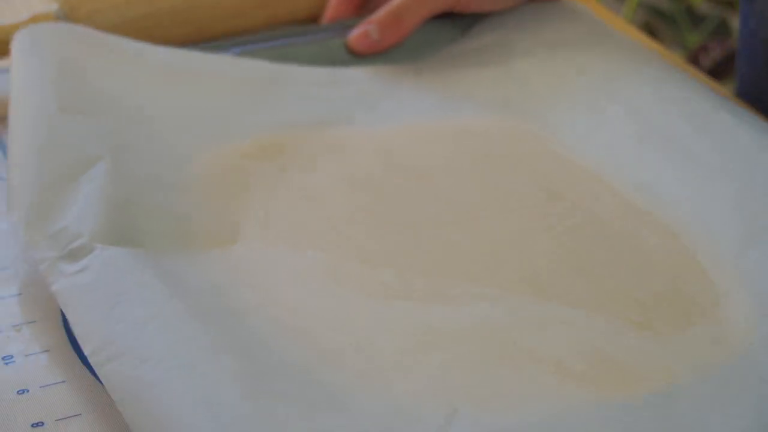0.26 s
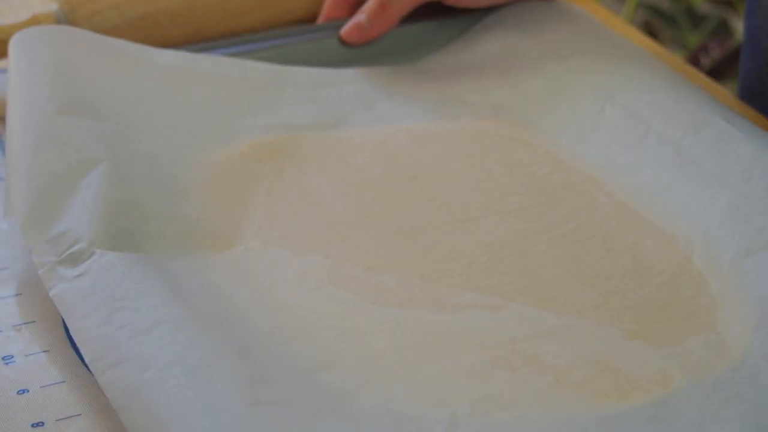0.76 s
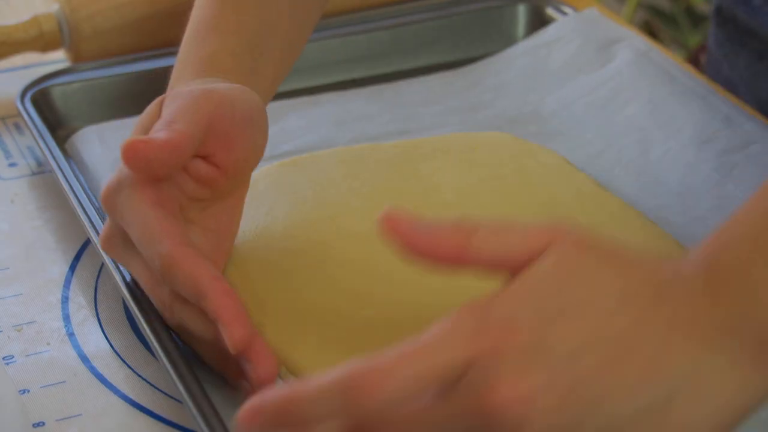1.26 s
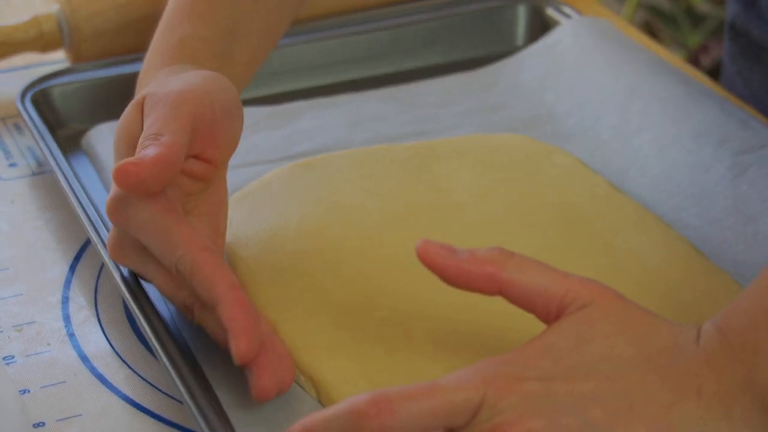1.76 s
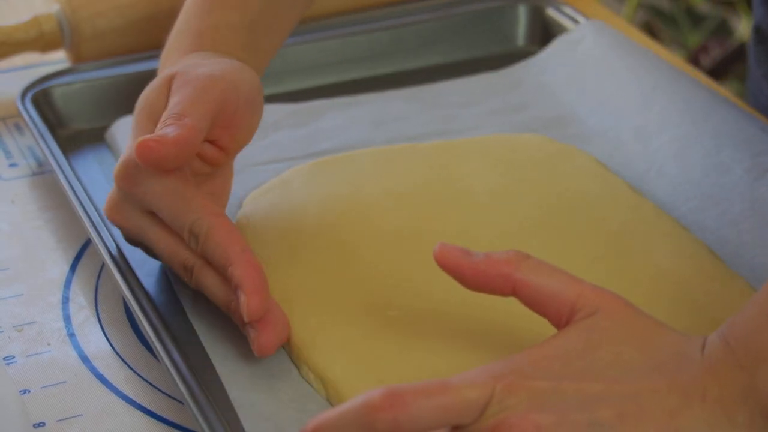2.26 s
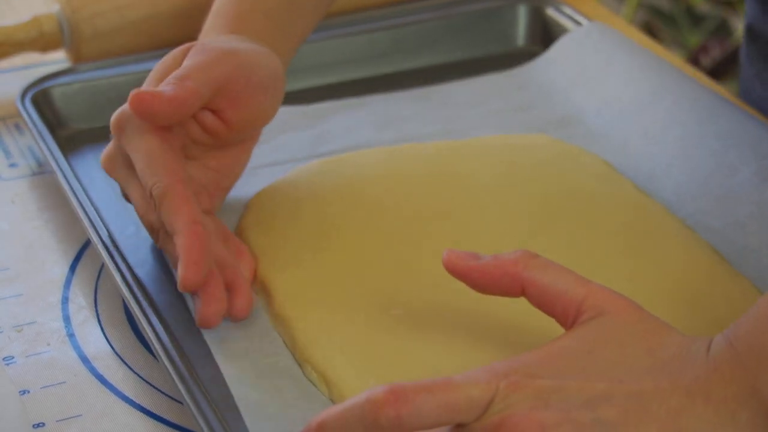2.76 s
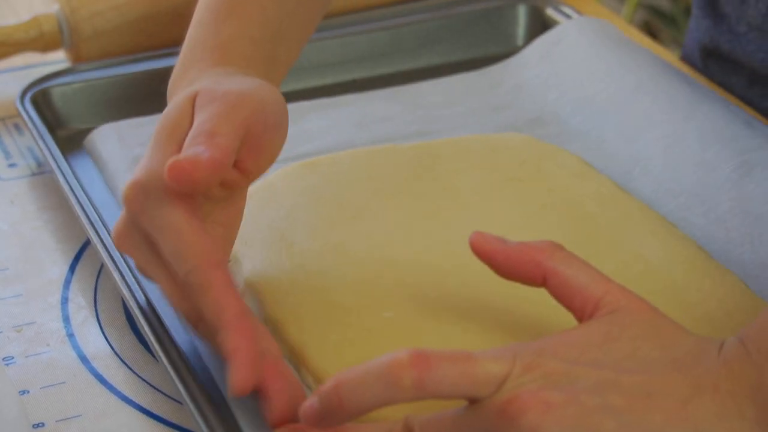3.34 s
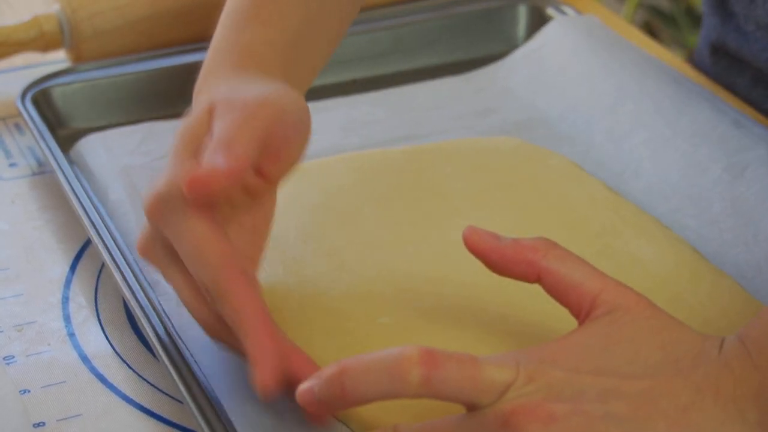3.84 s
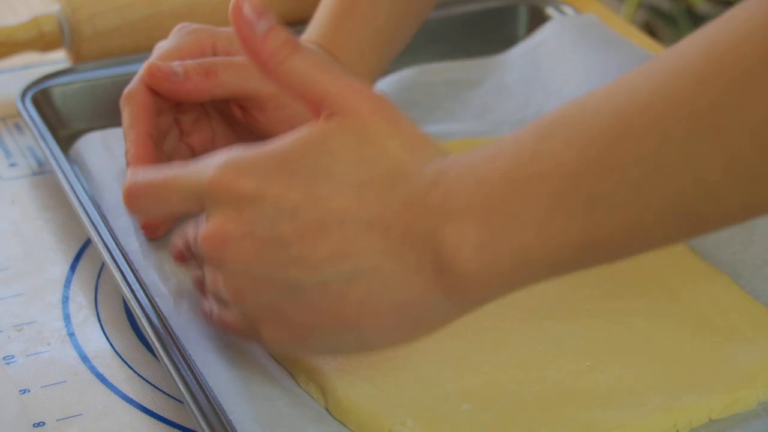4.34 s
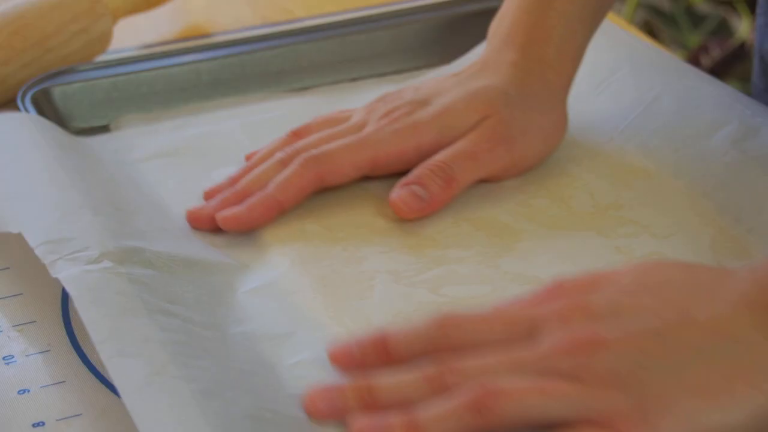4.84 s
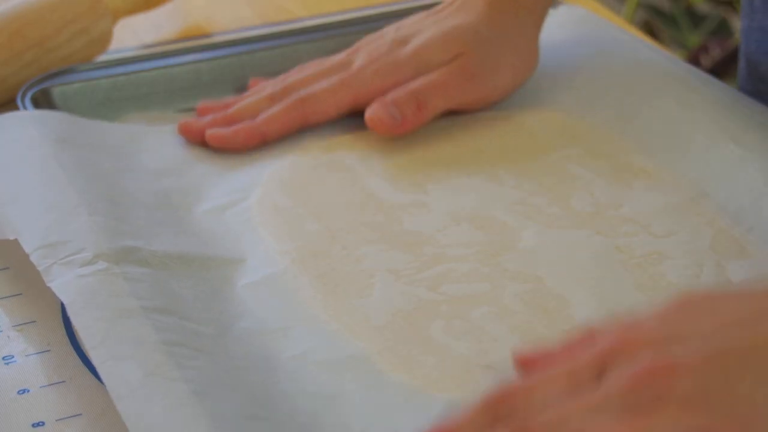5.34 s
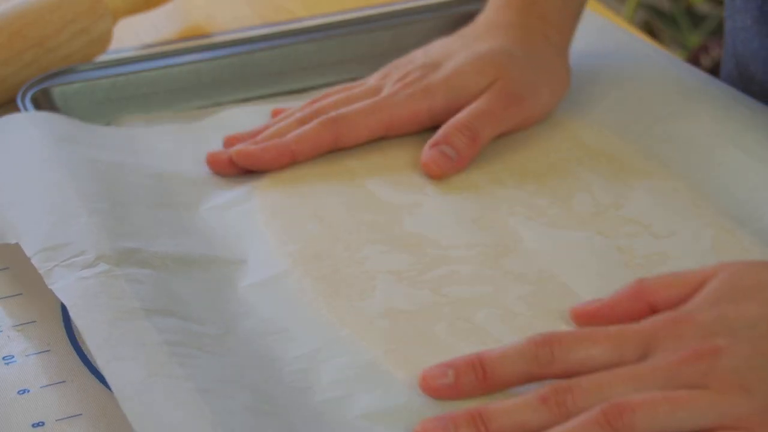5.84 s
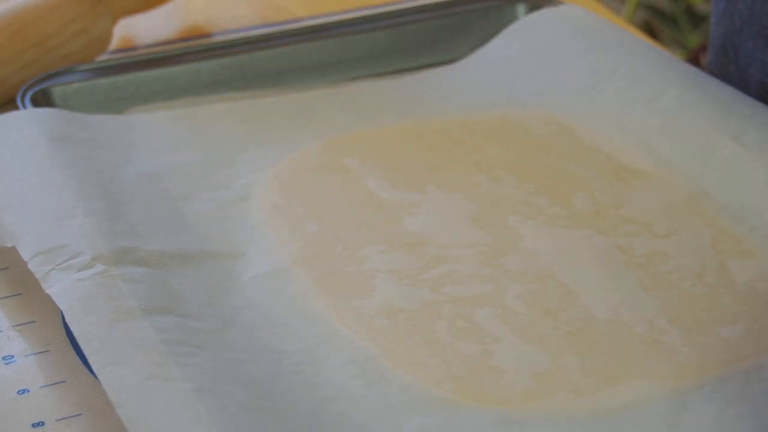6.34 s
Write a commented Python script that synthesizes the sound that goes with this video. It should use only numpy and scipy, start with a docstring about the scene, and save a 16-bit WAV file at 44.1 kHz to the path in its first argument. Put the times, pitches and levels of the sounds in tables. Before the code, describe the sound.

Hands press and smooth dough under baking paper; soft tray knocks, then crisp crinkling that gathers and peaks in a sharp crackle near the end.

```python
"""Hands press and smooth dough on baking paper in a metal tray, close to a single microphone in a kitchen.
It opens with tray knocks and quiet hiss; from about 1 s creases snap, loudest first near 1.3 s.
Strokes and snaps go on, crowd together from 4.8 s and peak near 5.8 s; last knocks come at about 6.5 s.
The paper is shaped noise, hissing under skin and snapping at creases; the tray is a set of ringing modes.
A short room echo follows paper and tray, and a faint hum of filtered noise lies under everything."""
import sys
import numpy as np
from scipy import signal
from scipy.fft import rfft, irfft
from scipy.io import wavfile
from scipy.ndimage import uniform_filter1d

SR = 44100
rng = np.random.default_rng(int(sys.argv[2]) if len(sys.argv) > 2 else 0)


def store_wav(level_fs):
    """Save 16-bit WAV to argv[1]."""
    pcm = np.round(np.clip(np.atleast_2d(level_fs), -1, 1) * 32767)
    wavfile.write(sys.argv[1], SR, pcm.T.astype(np.int16))


N = 291501  # length in samples

# tone colour of the paper, for hiss and snaps alike: pitch_hz [Hz], level_db [dB per Hz]
PAPER_COLOUR = [(120, -50), (200, -12), (306, -19), (388, -11.5), (701, -9), (977, -8), (1640, 0.5),
                (2690, 6.5), (8440, 3.5), (10500, -18), (14700, -18), (15500, -34), (16400, -14.5)]


def undb(db):
    """Turn decibels into a plain gain."""
    return 10 ** (np.asarray(db) / 20)


def unit(x):
    """Scale a sound to an average (RMS) level of one."""
    return x / np.sqrt(np.mean(x ** 2))


def curve(table, hz):
    """Read (Hz, value) points on a log-frequency axis."""
    point_hz, value = np.transpose(table)
    return np.interp(np.log(np.maximum(hz, 1)), np.log(point_hz), value)


def thirds(hz):
    """Split the spectrum softly into body, middle and air (edges 1.5 and 9.5 kHz); the shares add up to one."""
    body = 1 / (1 + (hz / 1500) ** 6)
    air = 1 - 1 / (1 + (hz / 9500) ** 16)
    return body, 1 - body - air, air


def fade(t, t60):
    """Die away by 60 dB in t60 seconds."""
    return np.exp(-np.log(1000) * t / t60)


def walk(rate):
    """Wander at random: levels held 1 / rate seconds, then smoothed twice; spread near 1."""
    hold = int(SR / rate)
    steps = np.repeat(rng.standard_normal(N // hold + 1), hold)
    smooth = uniform_filter1d(uniform_filter1d(steps, hold), hold)
    return 1.3 * smooth[:N]


def grit(per_s, spread_db, tail_ms):
    """Envelope of tiny slips: random moments, mostly small, each dying quickly."""
    hit = rng.random(N) < per_s / SR
    kicks = hit * undb(spread_db * np.minimum(rng.exponential(size=N), 3.1))
    keep = np.exp(-1 / (max(tail_ms, .05) * SR / 1000))
    return signal.lfilter([1], [1, -keep], kicks)


def strokes():
    """Loudness of the hiss in body, middle and air: each hand stroke rises, holds and falls in straight dB lines."""
    # hand strokes over the paper: top_s [s], middle_db [dB], rise_ms, hold_ms, fall_ms [ms; 20 dB per rise or fall],
    # body_db and air_db [dB against the middle]
    hand_strokes = [(0.0, -57.5, 10, 5.9, 192, 6.5, -7.5), (0.331, -63, 15, 8, 160, 2, -5),
                    (0.423, -60, 10, 6.1, 110, -4, -7), (0.884, -52.5, 80, 4, 104, -1.5, -7.5),
                    (1.01, -60, 43, 48, 150, -1.5, -10), (1.239, -54, 16, 26, 110, -11, -5),
                    (1.3, -39, 35, 29, 117, -5.5, -1), (1.419, -45.5, 20, 13, 68, -2, 4.5),
                    (1.552, -46, 190, 10, 84, -5.5, -8), (1.605, -45.5, 22, 10, 140, -2.5, -5),
                    (1.781, -54, 110, 29, 60, -5.5, -3.5), (1.871, -45, 42, 59, 85, -8, -4.5),
                    (2.022, -52.5, 80, 125, 84, -8.5, -3.5), (2.37, -55.5, 110, 44, 97, -0.5, 1),
                    (2.55, -50.5, 33, 20, 91, -8.5, -16), (2.61, -46, 80, 35, 89, -11.5, 2.5),
                    (2.71, -44, 67, 25, 46, -5, -5), (2.805, -45.5, 45, 14, 86, -6, -7),
                    (2.935, -45, 18, 44, 120, -14, -8), (3.014, -40.5, 107, 7.1, 55, -6, -0.5),
                    (3.085, -39.5, 21, 5, 47, -4, 7), (3.146, -42.5, 43, 7, 160, -2.5, -2.5),
                    (3.303, -46.5, 22, 4.5, 32, -9, -26), (3.43, -37, 120, 4.5, 89, -9.5, -6),
                    (3.568, -53.5, 32, 58, 110, -4, -4), (3.66, -44.5, 23, 36, 80, -5, -6),
                    (3.72, -42, 35, 14, 59, -11, -8), (3.772, -43, 10, 4.5, 95, -9, -2),
                    (3.85, -57, 100, 80, 50, -3.5, -5), (3.97, -62.5, 20, 85, 50, -5, -8),
                    (4.088, -43, 15.5, 74, 108, -4.5, -0.5), (4.24, -52.5, 130, 100, 150, -5, -4),
                    (4.39, -56, 18, 35, 120, -4, 5.5), (4.504, -52, 83, 10, 130, -4, -2),
                    (4.662, -49.5, 21, 11, 170, -4.5, -8), (4.772, -50, 26, 10, 80, -8, -13),
                    (4.803, -39.5, 21, 10, 260, -5, -17), (4.891, -34.5, 86, 80, 150, -11.5, 0.5),
                    (5.06, -35, 120, 80, 235, -14, -4), (5.24, -38.5, 150, 65, 110, -14.5, -4),
                    (5.36, -43.5, 150, 20, 163, -7.5, -9), (5.581, -57, 13, 53, 60, -1, -18),
                    (5.799, -26.5, 86, 11, 135, -14.5, -3), (5.96, -41, 170, 73, 96, -9, -5.5),
                    (6.61, -61, 400, 10, 100, -4, -3)]
    ms = np.arange(0, N / SR * 1000 + 1)
    power = 1e-12
    for top_s, middle_db, rise_ms, hold_ms, fall_ms, body_db, air_db in hand_strokes:
        since = ms - top_s * 1000
        rising = np.maximum(-since, 0) / max(rise_ms, 1)
        falling = np.maximum(since - hold_ms, 0) / max(fall_ms, 1)
        band_db = np.array([[body_db], [0], [air_db]])
        power = power + undb(middle_db - 20 * (rising + falling) + band_db) ** 2
    sample_ms = np.arange(N) / SR * 1000
    return [np.interp(sample_ms, ms, np.sqrt(p)) for p in power]


def slide(levels):
    """Skin drags over the fibres: a smooth hiss with slips on top, shared by all bands and partly each band's own."""
    hz = np.arange(N // 2 + 1) * SR / N
    colour = undb(curve(PAPER_COLOUR, hz))
    shared = unit(grit(260, 3.6, 1.0))
    hiss = 0
    # the higher the band, the more it follows the shared slips
    for share, level, sharp in zip(thirds(hz), levels, (.3, .45, .6)):
        slips = 1.43 + sharp * shared + 0.65 * unit(grit(150, 6.8, 2.7))
        noise = rng.standard_normal(N) * slips * undb(1.28 * walk(25.64))
        band = irfft(rfft(noise) * share * colour, N)
        hiss = hiss + unit(band) * level
    return hiss


def snaps(rows, size=4096, crest_db=10.0):
    """A crease pops: a sharp tick, more fibres give while it holds, then the sheet flutters out around its own pitch."""
    flutter_t60_s, slow_t60_s, air_t60_s, tick_t60_s = .018, .15, .03, .003
    lead = 64  # silent samples ahead of each pop
    out = np.zeros(N + size)
    hz = np.arange(size // 2 + 1) * SR / size
    colour = undb(curve(PAPER_COLOUR, hz))
    body, middle, air = thirds(hz)
    late = np.maximum((np.arange(size) - lead) / SR, 0)
    noises = rng.standard_normal((len(rows), size))
    for (start_s, peak_db, ring_hz, body_db, air_db, hold_ms, tick_db), noise in zip(rows, noises):
        after = np.maximum(late - hold_ms / 1000, 0)
        started = noise * (late > 0)
        tick = undb(tick_db)
        burst = started * (fade(after, flutter_t60_s) + 0.45 * fade(after, slow_t60_s))
        burst += tick * started * fade(late, tick_t60_s)
        burst[72:75] += tick * 1.4 * np.array([1, -.5, -1])  # the fold flips within a few samples
        ring = 1 + 1.4 / (1 + ((hz - ring_hz) / (.17 * ring_hz)) ** 2)
        pop = rfft(burst) * colour * ring
        i = int(start_s * SR) - lead
        # level is set at the loudest moment, averaged over span samples: about 1 ms for the middle, 7 ms for the rest
        for share, rel_db, span in ((middle, -crest_db, 40), (body, body_db, 300), (air, air_db, 300)):
            damp = fade(after, air_t60_s) if share is air else 1  # the air dies first
            part = irfft(pop * share, size) * damp
            loudest = np.sqrt(uniform_filter1d(part ** 2, size=span).max())
            out[i:i + size] += part / loudest * undb(peak_db + rel_db)
    return out[:N]


def crackle(hiss, count=400):
    """Many small creases: rows like the snaps at random moments, as strong as the hand is moving, each with its pitch."""
    per_s, over_hiss_db, spread_db = 25, 4, 3.0
    centre_hz, octaves = 3730, 0.2  # pitch strays this far up or down
    body_db, air_db, tick_db = -23.5, -22, 2
    gap, strength, pitch, hold = rng.random((count, 4)).T
    start_s = np.cumsum(-np.log(1 - gap) / per_s) + .01
    hiss_db = 20 * np.log10(np.interp(start_s * SR, np.arange(N), hiss))
    peak_db = hiss_db + over_hiss_db - spread_db * np.log(1 - .95 * strength)  # mostly small, a few strong
    ring_hz = centre_hz * 2 ** (octaves * (2 * pitch - 1))
    hold_ms = .4 + 3 * hold ** 2
    same = np.ones(count)
    rows = np.transpose([start_s, peak_db, ring_hz, body_db * same, air_db * same, hold_ms, tick_db * same])
    return rows[start_s < N / SR]


def tray():
    """A short push into the sheet: a blunt thud, ringing modes and a dull noise wash; shorter contact sounds brighter."""
    # knocks on the tray: start_s [s], level_db [dB], contact_ms [ms], tilt_db [dB per octave, over the modes],
    # most_hz [Hz, where the modes move most]
    knocks = [(.001, -38, 0.91, -5, 395), (.011, -48.5, 1.3, -3, 278), (0.044, -47, 0.67, 4.5, 387),
              (.319, -37, 1.94, 9.5, 205), (0.337, -42, 2.7, -5, 395), (.423, -39, 1.28, -5, 670),
              (0.427, -46.5, 1.06, -8, 460), (.44, -40.5, 2.1, 6, 460), (0.454, -43.5, 2.3, -9, 161),
              (0.873, -50, 0.9, -24, 282), (.885, -46, 1.53, -5.5, 168), (0.919, -49.5, 1.55, -16, 147),
              (1.264, -55.5, 4, -18, 210), (1.323, -44.5, 0.76, -18, 203), (1.622, -51.5, 0.95, -4, 220),
              (2.199, -53, 3.6, 14, 166), (2.99, -52, 2.3, -10, 164), (4.117, -48, 0.52, 0, 170),
              (4.79, -46, 1.6, 0, 172), (4.82, -53, 1.6, -25, 166), (5.812, -59, 5.8, -3, 345),
              (6.479, -53, 0.52, -10, 955), (6.527, -46.5, 0.58, 9, 674), (6.539, -46, 0.76, 8.5, 378),
              (6.579, -48.5, 0.2, 12, 667), (6.584, -48, 2, 6, 190)]
    # ways the tray can ring: pitch_hz [Hz], level_db [dB], t60_s [s to die by 60 dB]
    tray_modes = [(149, -25.5, 0.043), (168.8, -5.5, 0.19), (223.5, 1.5, 0.23), (265, -2.5, 0.092),
                  (283.6, 0.5, 0.56), (339, 1, 0.14), (392, 4.5, 0.31), (461.6, 17, 0.087), (564, -8, 0.22),
                  (559, -10, 0.22), (681, 11, 0.11), (806, -10, 0.21), (875, -17, .6), (937, 9, 0.29),
                  (1160, -18, .4), (1530, -19, 0.14), (1500, -34, .25), (1810, -8, .3), (2100, -7, .25),
                  (2330, -1, 0.22), (2670, -12, 0.1)]
    hz, mode_db, t60_s = np.transpose(tray_modes)
    out = np.zeros(N + SR)
    t = np.arange(SR) / SR
    wash_band = signal.butter(2, [130, 1800], "bandpass", fs=SR, output="sos")
    wash = signal.sosfilt(wash_band, rng.standard_normal(N + SR))
    chances = rng.standard_normal((len(knocks), 2, len(tray_modes)))
    for (start_s, level_db, contact_ms, tilt_db, most_hz), (place, split) in zip(knocks, chances):
        i = max(int(start_s * SR), 0)
        most_db = 12 / (1 + ((hz - most_hz) / (.08 * most_hz)) ** 2)
        gains = undb(mode_db + most_db + tilt_db * np.log2(hz / 400) + 0.5 * place)
        # each mode swells and sinks at its own random rate, so the ring beats
        beats = 1 + .4 * np.cos(2 * np.pi * (.015 * hz * split)[:, None] * t)
        tones = np.sin(2 * np.pi * hz[:, None] * t)
        modes = gains @ (beats * fade(t, t60_s[:, None]) * tones)
        thud = fade(t, 0.012) * np.sin(2 * np.pi * np.sqrt(400 * most_hz) * t)
        dull = unit(wash[i:i + SR]) * fade(t, 0.13)
        ring = modes / np.std(modes[:1024]) + 0.74 * thud + dull
        push = np.hanning(max(contact_ms * SR / 1000, 3))  # a smooth hump of force
        ring = signal.fftconvolve(ring, push)[:SR]
        out[i:i + SR] += ring / np.std(ring[:1024]) * undb(level_db)
    return signal.sosfilt(signal.butter(4, 120, "highpass", fs=SR, output="sos"), out[:N])


def room(x):
    """Echo of the room: octave bands of noise, each dying at its own rate."""
    # how long the room rings: pitch_hz [Hz], t60_s [s to die by 60 dB]
    room_decay = [(200, 0.42), (1000, 0.46), (4000, 0.37), (12000, 0.12)]
    size = SR // 2
    t = np.arange(size) / SR
    hz = np.arange(SR // 4 + 1) * 2.
    noise = rfft(rng.standard_normal(size))
    tail = 0
    for centre in 125 * 2. ** np.arange(8):
        band = np.clip(1 - np.abs(np.log2(np.maximum(hz, 1) / centre)), 0, 1)
        tail = tail + irfft(noise * band) * fade(t, curve(room_decay, centre))
    tail = tail * np.clip(t / 0.0038, 0, 1)  # the echo builds up over 3.8 ms
    return signal.fftconvolve(x, tail / np.sqrt(np.sum(tail ** 2)))[:N]


def hum():
    """Room tone from shaped noise; its two lowest layers swell on their own."""
    # tone colour of the hum: pitch_hz [Hz], level_db [dB per Hz]
    hum_colour = [(8, -5), (18, 12), (28, 5), (40, -7), (55, -9), (74, 0.5), (100, -15), (160, -15.5),
                  (230, -20), (280, -23), (340, -24), (670, -28.5), (1500, -34), (9000, -47), (10500, -47),
                  (15000, -46), (16400, -56)]
    # swells of the lowest layers: time_s [s], low_db [dB, below about 40 Hz], drone_db [dB, near 74 Hz]
    rumble = [(0.0, -69, -59), (0.26, -68, -64), (0.48, -62, -64), (0.51, -60, -83), (0.59, -62, -68),
              (1.42, -54, -65), (1.88, -62, -68), (3.28, -53, -65), (3.87, -62, -64), (4.77, -55, -64),
              (5.21, -63, -70), (5.49, -66, -61), (5.82, -63, -69), (6.61, -57, -58)]
    upper_db = -65  # everything above the drone
    t = np.arange(N) / SR
    hz = np.arange(N // 2 + 1) * SR / N
    tone = rfft(rng.standard_normal(N)) * undb(curve(hum_colour, hz))
    low = 1 / (1 + (hz / 42) ** 8)
    low_and_drone = 1 / (1 + (hz / 100) ** 8)
    time_s, low_db, drone_db = np.transpose(rumble)
    layers = ((low, np.interp(t, time_s, low_db)),
              (low_and_drone - low, np.interp(t, time_s, drone_db)),
              (1 - low_and_drone, upper_db))
    return sum(unit(irfft(tone * share, N)) * undb(db) for share, db in layers)


def scene():
    """Add up paper, tray, their echo in the room and the hum."""
    # creases that stand out: start_s [s], peak_db [dB, nominal], ring_hz [Hz], body_db and air_db [dB against the peak],
    # hold_ms [ms], tick_db [dB, first tick over flutter]
    big_creases = [(0.1058, -52.5, 2780, -2, -28, 1.2, 4), (0.3327, -49, 1600, 1.5, -22, 1.4, 7),
                   (0.3496, -50, 1560, -9, -28, 1.2, 6), (0.3794, -39.5, 1650, -17, -30, 1.2, 1),
                   (0.4623, -46, 1970, -16, -25, 1.2, 4), (0.505, -55, 1650, -9, -17, 1.2, 3),
                   (1.0069, -28.5, 2580, -22.5, -45, 0.8, 4), (1.044, -33, 2750, -23, -45, 1.4, 6),
                   (1.0631, -28, 2600, -20.5, -51, 2.4, 2), (1.2344, -30.5, 3100, -23, -14, 1.5, -2),
                   (1.284, -28.5, 8610, -27, -25, 1.8, -2), (1.2914, -18.5, 5370, -31, -11.5, 3.6, -1),
                   (1.3021, -22.5, 8500, -30, -9, 1.8, 2), (1.3112, -11.5, 8600, -32, -14, 1.2, 2),
                   (1.3755, -23, 6600, -28, -20, 1.7, 1), (1.495, -28.5, 3380, -18, -23, 1.8, 6),
                   (1.5234, -24.5, 4210, -29, -21, 1.6, 6), (1.5443, -20, 4830, -27.5, -16, 1.7, 3),
                   (1.6015, -19, 2800, -32, -14, 1.5, 4), (1.6065, -13, 8300, -31.5, -32, 2.6, 6),
                   (1.613, -16, 1830, -46, -16, 1.2, 6), (1.6576, -26, 3960, -34, -28, 1.4, 6),
                   (1.6853, -29, 3150, -35, -29, 1.4, 6), (1.9021, -24, 3570, -23.5, -22, 1.5, 3),
                   (1.9341, -28, 1840, -18, -27, 1.2, -2), (1.958, -30.5, 1860, -19, -37, 1.4, 4),
                   (2.038, -34.5, 2010, -33, -15, 1.3, 6), (2.1206, -32, 4300, -28, -16, 1.2, 2),
                   (2.1532, -37.5, 3200, -16, -13, 1.1, 9), (2.2022, -36.5, 3240, -24, -32, 1.5, 3),
                   (2.254, -41, 3170, -18, -22, 1.2, 8), (2.2699, -31, 1790, -15, -14, 1.9, 8),
                   (2.283, -37, 1640, -25, -20, 1.2, 8), (2.3565, -29.5, 3980, -38, -21, 1.1, 6),
                   (2.37, -18, 5140, -54, -20.5, 1.2, 9), (2.394, -32, 8560, -24, -17, 1.2, 9),
                   (2.409, -18, 2720, -37, -26, 1.7, 5.5), (2.7878, -31, 3960, -23, -21, 1.1, 6),
                   (2.9317, -36, 9000, -20, -4, 0.85, 10), (3.0036, -21.5, 7360, -26, -11.5, 1, 8),
                   (3.066, -35, 1500, -17, -21, 1.2, 6), (3.0762, -23.5, 8530, -30, -24, 1.9, 4),
                   (3.0853, -12.5, 7500, -37, -17, 1.2, 6), (3.1393, -21, 7100, -22, -14, 1.8, 3),
                   (3.2283, -24, 3700, -22, -33, 2, 3), (3.2483, -35.5, 2130, -11, -42, 0.43, 6),
                   (3.3081, -28, 4060, -25, -15, 0.9, 8), (3.4255, -23, 3630, -31, -14, 1.5, 3),
                   (3.5133, -26.5, 3300, -28.5, -25, 1.2, 14.5), (3.7199, -23, 8000, -20.5, -18, 2.9, 9),
                   (3.7716, -17, 8180, -28, -17, 1.2, -1), (3.7858, -25.5, 6930, -20, -23, 1, 8),
                   (3.8865, -28, 3920, -19.5, -19, 1.2, 6), (3.9213, -31, 1820, -15.5, -20, 1.2, 6),
                   (3.9702, -26.5, 3710, -31, -18.5, 1.3, 3), (3.9846, -35, 5810, -34, -29, 1.3, 6),
                   (4.0774, -42.5, 1870, -4, -22, 0.72, 6), (4.0979, -30.5, 1470, -7.5, -23, 1.2, 1),
                   (4.115, -18, 5650, -19.5, -18, 1.4, 9), (4.1485, -26, 7630, -20, -16, 1.6, 6),
                   (4.2891, -27.5, 1630, -19, -16, 1.7, 9), (4.3252, -27.5, 8310, -24, -14, 1, 11),
                   (4.3426, -33, 3070, -30, -21, 1.2, 6), (4.3682, -34, 3910, -24, -24, 1.2, 4),
                   (4.3943, -21, 6500, -23.5, -18.5, 0.48, 11), (4.498, -25.5, 6100, -20.5, -12, 0.99, 5),
                   (4.5115, -30, 5660, -18, -10, 1.2, 6), (4.5358, -33, 6230, -20, -27, 1.2, 3),
                   (4.6575, -29, 6100, -20.5, -15, 0.98, 7), (4.7072, -34, 3120, -31, -19, 1, 8),
                   (4.7252, -38, 2100, -22, -11, 0.8, 6), (4.7414, -21.5, 4400, -22, -18, 1.8, 6),
                   (4.788, -23.5, 3440, -21, -19, 0.75, 6), (4.802, -16.5, 6940, -36, -16.5, 1.8, 10),
                   (4.8458, -18.5, 8700, -22.5, -24, 2.4, -1), (4.8564, -24, 6820, -22, -26, 1.2, 6),
                   (4.8801, -12, 3380, -49, -20, 1.9, 6), (4.8918, -13, 4880, -39, -18, 1.5, -1),
                   (4.927, -17, 5460, -25, -15, 1.2, 8), (4.9497, -24, 3820, -23, -18, 1.2, 7),
                   (5.0062, -21, 3900, -25, -22, 1.2, 6), (5.0258, -18.5, 4760, -35, -30, 0.98, 8),
                   (5.0346, -13.5, 4170, -42, -34, 0.88, 10), (5.0608, -20, 3630, -31, -25, 1.4, 6),
                   (5.072, -15.5, 2750, -31, -22, 1, 8), (5.0885, -20.5, 2560, -26, -18, 1.2, 1),
                   (5.1133, -18.5, 3970, -24, -23, 1.1, 12), (5.1407, -29, 2620, -25, -22, 1.2, 6),
                   (5.1866, -20, 5110, -27, -17, 1.2, 6), (5.1964, -18.5, 8740, -29, -18, 1.4, 3),
                   (5.2184, -23, 4030, -27, -20, 1.2, 11), (5.264, -25, 3980, -25, -25, 1.2, 6),
                   (5.2867, -19.5, 5640, -30, -26, 2.3, 6), (5.3094, -24, 2340, -23, -20, 1.2, 8),
                   (5.3528, -26, 2060, -21, -22, 1.6, 2), (5.3826, -18.5, 2740, -25, -29, 2.3, -1),
                   (5.4161, -25.5, 4260, -27, -35, 1.8, 3), (5.4324, -26, 3950, -20, -26, 0.81, 2),
                   (5.487, -28, 3970, -27, -46, 1.4, 7), (5.5137, -30, 3996, -20, -42, 1.3, 6),
                   (5.6196, -33.5, 4050, -26, -19, 1.2, 6), (5.7828, -12, 4560, -29, -14, 1.2, 9),
                   (5.806, -7, 4530, -43, -23, 0.96, 10), (5.8144, -11, 4770, -45, -23, 1.2, 3),
                   (5.8304, -19, 4420, -26, -17, 1, 6), (5.8597, -20, 4880, -20.5, -22, 1.2, 6),
                   (5.8969, -19, 3060, -24, -33, 0.61, 8), (5.9342, -27, 2630, -19, -21, 1.2, 6),
                   (5.95, -22.5, 2750, -25, -26, 1, 6), (5.9895, -15.5, 4600, -28, -28, 2.2, 6),
                   (6.0317, -20.5, 2840, -27, -21, 2, 13), (6.0432, -25.5, 2200, -20, -22, 1.4, 6),
                   (6.0667, -31, 2690, -19, -33, 1.9, 2), (6.1337, -38, 1860, -17, -35, 1.3, 6),
                   (6.185, -40.5, 2570, -20.5, -36, 1.5, 3)]
    levels = strokes()
    paper = slide(levels) + snaps(big_creases) + snaps(crackle(levels[1]))
    metal = tray()
    echo = room(undb(-15) * paper + undb(-9.5) * metal)
    return (paper + metal + echo + hum())[None]


def record(dry):
    """The recorder cuts the top steeply, above 15.9 kHz."""
    return signal.sosfilt(signal.ellip(10, .2, 70, 15900, fs=SR, output="sos"), dry)


dry = scene()
out = record(dry)
store_wav(out)
```